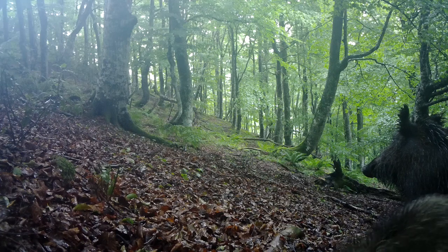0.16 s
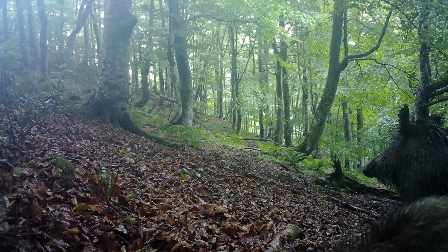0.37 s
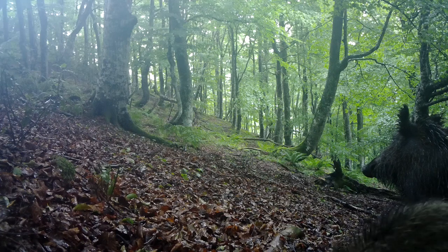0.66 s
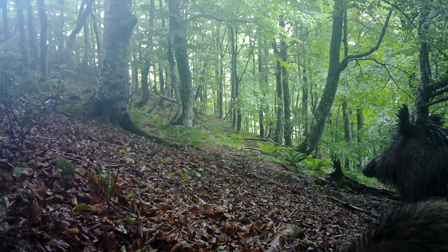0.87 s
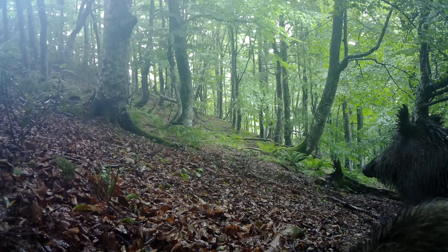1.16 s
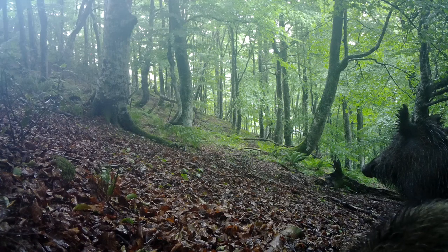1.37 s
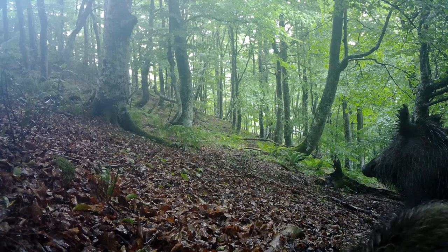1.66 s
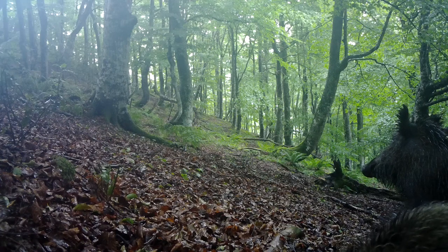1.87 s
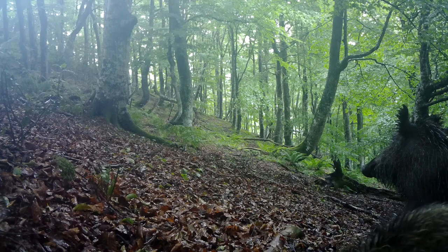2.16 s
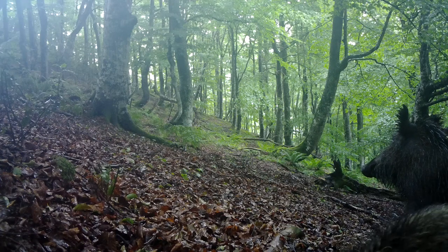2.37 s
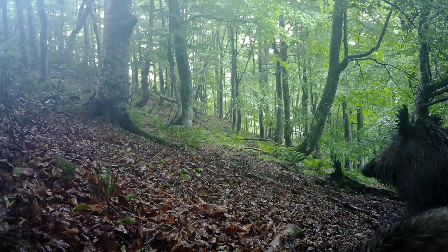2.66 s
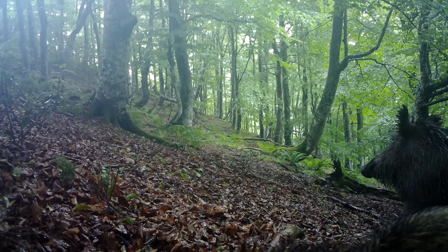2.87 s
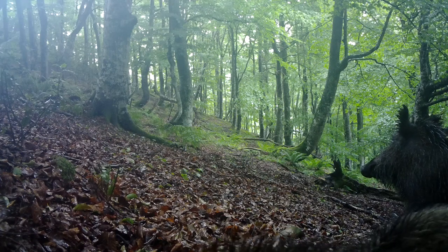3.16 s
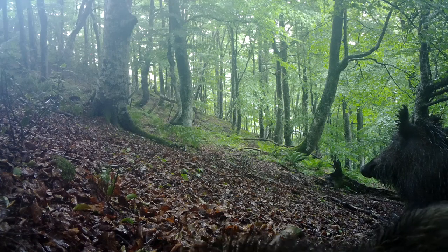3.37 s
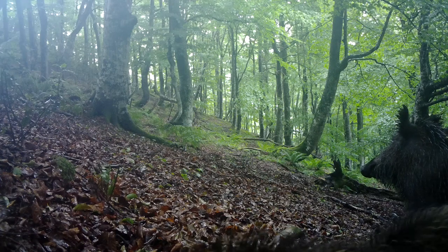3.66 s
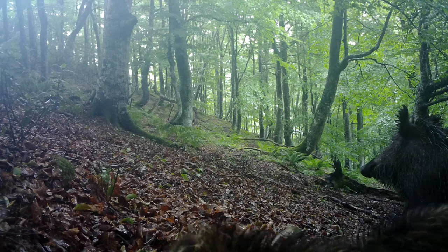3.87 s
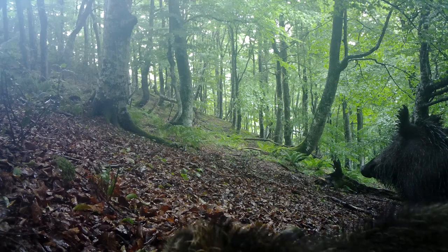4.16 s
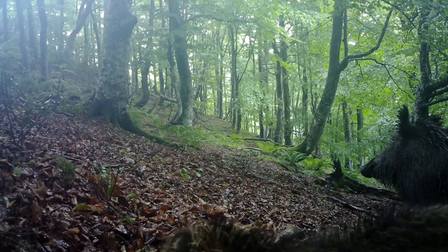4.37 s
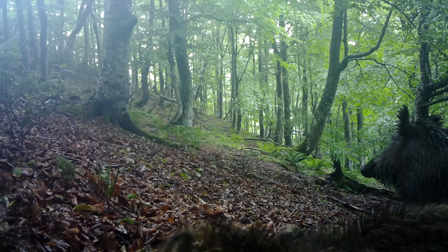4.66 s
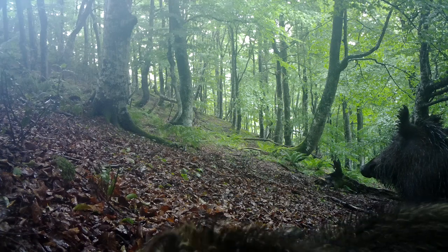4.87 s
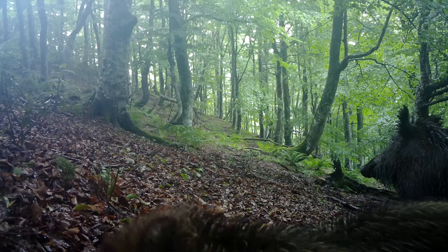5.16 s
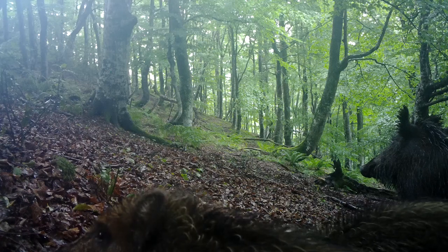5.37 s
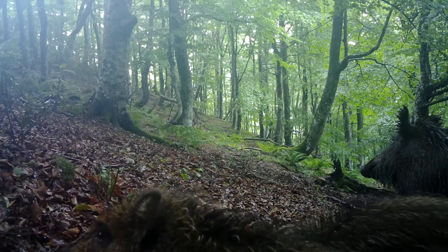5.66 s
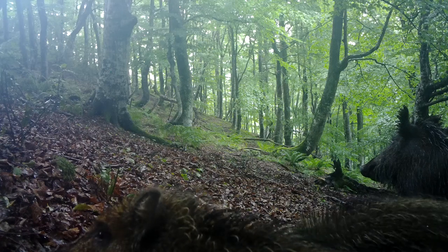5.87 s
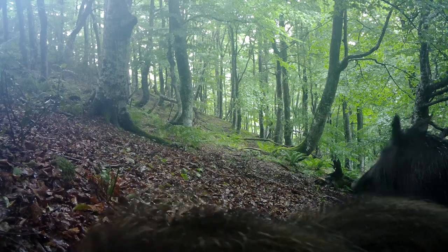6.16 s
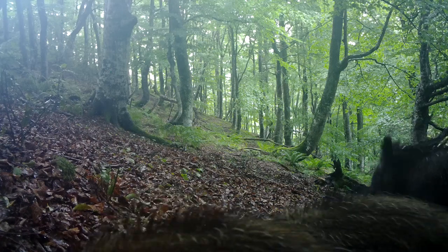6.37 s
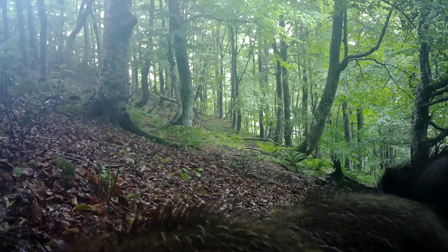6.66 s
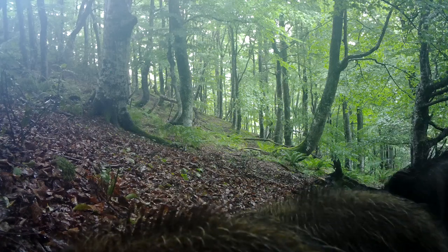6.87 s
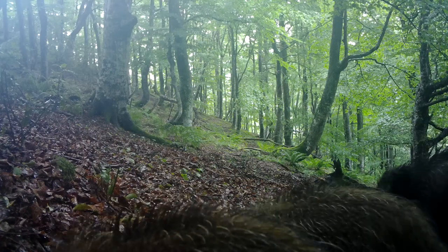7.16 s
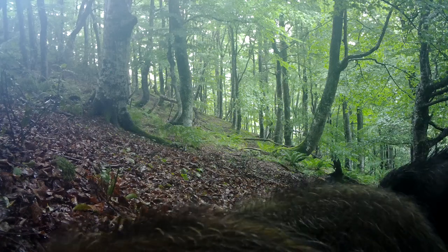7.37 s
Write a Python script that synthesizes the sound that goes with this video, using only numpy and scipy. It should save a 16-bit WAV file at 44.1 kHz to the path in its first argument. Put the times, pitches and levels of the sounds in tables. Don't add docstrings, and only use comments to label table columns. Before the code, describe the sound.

Steady rain hisses through a wood while close drops tick and splash on leaves, dry litter rustles, and an animal snorts near the end.

```python
import sys
import numpy as np
from scipy import signal
from scipy.io import wavfile

SR = 44100
rng = np.random.default_rng(int(sys.argv[2]) if len(sys.argv) > 2 else 0)


def boost_factor(decibels):
    exponent = np.asarray(decibels, float) / 20
    return 10 ** exponent


def generate_wav(sig):
    pcm = np.round(np.clip(np.atleast_2d(sig).T, -1, 1) * 32767).astype(np.int16)
    wavfile.write(sys.argv[1], SR, pcm)


N = 331632


def rms_one(x):
    return x / np.sqrt(np.mean(x ** 2) + 1e-20)


def at_hz(points, hz):
    point_hz, point_db = np.transpose(points)
    return np.interp(np.log(hz), np.log(point_hz), point_db)


def drift(rate_hz):
    r = np.exp(-80 * np.pi * rate_hz / SR)
    sparse = rng.standard_normal(N // 40 + 2002)
    slow = signal.lfilter([1], [1, -2 * r, r * r], sparse)[2000:]
    return np.interp(np.arange(N) / 40, np.arange(len(slow)), rms_one(slow))


def bands(low_hz, octaves):
    edges_hz = low_hz * 2 ** np.arange(0, octaves, 1 / 3)
    for low, high in zip(edges_hz, edges_hz[1:]):
        yield np.sqrt(low * high), signal.butter(2, [low, high], "band", fs=SR, output="sos")


def band_pass(x, low_hz, high_hz):
    band = signal.butter(2, [low_hz, min(high_hz, .45 * SR)], "band", fs=SR, output="sos")
    return signal.sosfilt(band, x)


def ring(hz, t60_s, size):
    t = np.arange(size) / SR
    return np.sin(2 * np.pi * hz * t) * boost_factor(-60 * t / t60_s)


def splashes(count, decay_s, contact):
    tail_s = 0.012
    t = np.arange(1200) / SR
    envelope = np.exp(-t / decay_s) + 0.14 * np.exp(-t / tail_s)
    spray = rng.standard_normal((count, len(t))) * envelope
    spray[:, 0] += contact
    return spray


def place(times_s, sounds):
    out = np.zeros(N + sounds.shape[1])
    for s, sound in zip(times_s, sounds):
        start = round(s * SR)
        out[start:start + len(sound)] += sound
    return out[:N]


def swells(rows):
    drop_db = 20
    s, peak_db, rise_s, fall_s = np.transpose(rows)[:4, :, None]
    since_s = np.arange(0, N, 16) / SR - s
    rising = -since_s / np.maximum(rise_s, .002)
    falling = since_s / np.maximum(fall_s, .002)
    slope = np.where(since_s < 0, rising, falling)
    return boost_factor(np.maximum(peak_db - drop_db * slope, -140))


def every_sample(coarse):
    return np.interp(np.arange(N) / 16, np.arange(len(coarse)), coarse)


def all_drops():
    # (time [s], peak level [dB], leaf mode [Hz], body under 3 kHz [dB], top above 6.5 kHz [dB])
    close_drops = [(0.489, -10, 4050, -5, -5), (0.5073, -9, 5400, 8, 3), (0.916, -17, 6500, -14, -3),
                   (0.956, -19, 2680, 5, -2), (1.058, -9.5, 2200, -5, -2.5), (1.0914, -23, 8000, -21, -3),
                   (1.234, -12.5, 7200, -14, 2), (1.5034, -20, 7900, -10, -2), (1.7926, -19, 5870, -12, -8),
                   (1.855, -22, 6000, -3, -1), (2.418, -17, 7540, 9, 12), (2.4445, -21, 8900, -3, 4),
                   (2.6219, -14.5, 3100, 2, -1), (2.8846, -16, 8500, 6, 17), (3.1347, -15.5, 5030, -0.5, 2),
                   (3.2061, -18.5, 10300, 4, 8), (3.3282, -19, 7830, 3, 1), (3.3555, -17, 4440, -22, 6),
                   (3.4416, -17.5, 4830, -3, 3), (3.9235, -14.5, 2920, -7, -5),
                   (4.018, -15.5, 8250, -10, 4), (5.246, -15, 5570, -6, 3), (5.7706, -16, 7740, -6, -3),
                   (5.8444, -17.5, 5920, -34, -4)]
    # (time [s], peak level [dB], leaf mode [Hz])
    small_drops = [(0.2414, -21, 6050), (0.3962, -22, 5900), (0.4135, -19, 3920), (0.781, -19.5, 5000),
                   (1.1353, -22, 4100), (1.6381, -20, 2600), (1.8264, -19, 1930), (1.9289, -22, 5600),
                   (1.9754, -21.5, 3960), (2.0286, -22.5, 5700), (2.3268, -23, 5870), (2.415, -29, 2140),
                   (2.7028, -24, 4100), (2.7524, -23, 4040), (2.9387, -19.5, 6070), (3.1675, -20.5, 4000),
                   (3.86, -21.5, 2800), (3.9648, -22, 4850), (4.457, -26, 4290), (4.5535, -21, 6900),
                   (4.6245, -23, 6330), (4.989, -27, 4830), (6.365, -28, 4030), (1.532, -32, 4000),
                   (6.493, -22, 4100), (6.9795, -22.5, 2440), (7.037, -21, 4850), (7.151, -18.5, 5900),
                   (7.188, -20.5, 5130), (7.451, -20.5, 6400)]
    small = []
    for s, peak_db, hz in small_drops:
        octaves = np.log2(hz / 5000)
        body_db = -3 - 4.0 * octaves
        top_db = -3 + 2 * octaves
        small.append((s, peak_db, hz, body_db, top_db))
    return np.transpose(close_drops + small)[:, :, None]


def rain():
    # (time [s], level [dB])
    rain_level = [(0.0, -37), (0.27, -39), (0.67, -38.5), (0.88, -40), (1.3, -38.5), (1.86, -39.5),
                  (2.28, -39.5), (2.6, -38.5), (2.9, -40.5), (3.44, -39.5), (4.19, -40.5), (4.77, -40.5),
                  (5.59, -40), (5.97, -40.5), (6.22, -39), (6.5, -39.5), (7.01, -39), (7.52, -39)]
    # (frequency [Hz], density [dB per Hz])
    rain_colour = [(88, -30), (150, -2), (226, -9.5), (313, 1), (385, -3.5), (515, 1), (666, -5),
                   (1020, -2.5), (1650, -4), (1990, -0.5), (4610, 1), (9000, -2.5), (11200, -8),
                   (12800, -11), (16000, -16)]
    patter_per_s, patter_db, patter_spread_db = 150, -11.5, 5
    patter_decay_s, patter_hz, patter_octaves = 0.0014, 8900, 1.2

    litter_db = np.interp(np.arange(N) / SR, *np.transpose(rain_level))
    swing_db = litter_db - litter_db.mean()
    spray_db = -44.6 + 1.56 * swing_db
    drone_db = -47 + 0.98 * swing_db

    chance, size, pitch = rng.random(N), rng.exponential(1, N), rng.standard_normal(N)
    at = np.flatnonzero(chance < patter_per_s * boost_factor(3.0 * drift(6)) / SR)
    strength = boost_factor(patter_db + patter_spread_db * np.minimum(size[at], 3.5))
    octave = np.log2(patter_hz) + .9 * pitch[at]

    white, together = rng.standard_normal((2, N)), drift(41)
    fade = np.exp(-1 / (patter_decay_s * SR))
    layers = np.zeros((3, N))
    for k, (hz, band) in enumerate(bands(140, 7.1)):
        hits = np.full(N, 1e-18)
        hits[at] = strength * np.exp(-((np.log2(hz) - octave) / patter_octaves) ** 2)
        opening = 1 + signal.lfilter([1], [1, -fade], hits)
        noise = signal.sosfilt(band, white[k % 2] * opening)
        noise = rms_one(noise) * np.sqrt(hz)
        flicker_db = (0.067 * together + 0.92 * drift(8.7)) * min(hz / 3000, 1)
        layer = np.searchsorted([1600, 6800], hz)
        layers[layer] += noise * boost_factor(at_hz(rain_colour, hz) + flicker_db)
    drone, litter, spray = map(rms_one, layers)
    return boost_factor(litter_db - 0.08) * litter + boost_factor(spray_db) * spray + boost_factor(drone_db) * drone


def rustle():
    # (time [s], peak level [dB], rise [s], fall [s], brightness [dB])
    stir_rows = [(0.0, -35, .02, 0.018, -10), (0.246, -39, 0.082, .01, -12), (1.38, -32.5, 0.03, 0.056, -7),
                 (1.875, -31.5, 0.073, 0.14, -10), (2.408, -38, .03, .06, -11), (2.48, -35, 0.068, .07, -5),
                 (2.62, -37.5, 0.0091, .2, -9), (4.022, -34, 0.027, 0.054, -7),
                 (4.992, -35.5, 0.039, 0.056, -4), (5.245, -35, .01, 0.017, -3),
                 (5.27, -38.5, .01, 0.4, -7), (6.21, -42, 0.098, .14, 4.5), (6.28, -41, .08, .06, -5),
                 (6.8, -37.5, .02, 0.14, -12), (6.894, -30.5, 0.038, 0.092, -8),
                 (7.158, -38, .2, 0.016, -23), (7.188, -42, .02, 0.078, -15)]
    # (low edge [Hz], high edge [Hz])
    litter_bands = [(300, 2300), (3000, 8000), (7000, 12500)]
    cracks_per_s, crack_decay_s = 1800, 0.0011

    stirs = swells(stir_rows)
    level = every_sample(stirs.max(axis=0))
    bright = every_sample((stirs * boost_factor(np.array(stir_rows)[:, -1:])).max(axis=0))
    crack_gain = boost_factor(1.4 * np.minimum(rng.exponential(1, N), 3))
    cracks = (rng.random(N) < cracks_per_s / SR) * crack_gain
    fade = np.exp(-1 / (crack_decay_s * SR))
    gate = .5 + signal.lfilter([1], [1, -fade], cracks + 1e-18)
    noise = gate * rng.standard_normal(N)
    crunch, crackle, fizz = (rms_one(band_pass(noise, *band)) for band in litter_bands)
    return level * (boost_factor(-7.0) * crunch + crackle) + bright * fizz


def air():
    # (frequency [Hz], density [dB per Hz])
    air_colour = [(7.1, -30), (12, 1.5), (49, -0.5), (112, -4.5), (190, -15.5), (250, -24), (420, -120)]
    # (time [s], peak level [dB], rise [s], fall [s])
    puffs = [
        (0.0, -32.5, .05, 0.081),
        (0.79, -49, .15, .2),
        (2.14, -41, 0.054, 0.095),
        (4.3, -47, 0.39, .3),
        (5.19, -43, .07, 0.08),
        (6.86, -39, 0.084, .15),
        (6.97, -34, 0.26, 0.093),
        (7.12, -37, 0.2, 0.046),
        (7.2, -55, .06, .08),
    ]
    white = rng.standard_normal((2, N))
    rumble = np.zeros(N)
    for k, (hz, band) in enumerate(bands(12, 4.5)):
        rumble += signal.sosfilt(band, white[k % 2]) * boost_factor(at_hz(air_colour, hz))
    breeze = boost_factor(-48 + 1.05 * drift(9.6))
    puff = every_sample(swells(puffs).max(axis=0))
    return np.hypot(breeze, puff) * rms_one(rumble)


def ticks():
    # (time [s], peak level [dB])
    strong_ticks = [(0.2019, -27), (0.3177, -25), (0.5072, -24), (1.1982, -19), (1.2196, -25), (1.2346, -24),
                    (1.8397, -30), (2.2702, -29), (2.4049, -31), (2.5656, -24), (2.6219, -27), (2.7107, -28),
                    (3.1592, -25), (3.2061, -21), (3.3563, -23), (3.4416, -23), (3.4865, -26), (3.5219, -23),
                    (3.9235, -24), (4.4573, -24), (4.6897, -19), (4.7162, -24), (5.1422, -27), (5.2435, -26),
                    (5.5942, -27), (5.8436, -20), (6.1968, -34), (6.8453, -27), (6.5899, -24), (7.453, -20)]
    drop_s, drop_db = all_drops()[:2]
    strong_s, strong_db = np.transpose(strong_ticks)[:, :, None]
    thrown_db = -30 + .4 * (drop_db - drop_db.mean())
    s = np.vstack([strong_s, drop_s])
    peak_db = np.vstack([strong_db, thrown_db])
    spray = splashes(count=len(s), decay_s=0.00036, contact=4.0)
    return place(s[:, 0] + .001, boost_factor(peak_db) * band_pass(spray, 10800, 14700))


def drops():
    # (low edge [Hz], high edge [Hz])
    leaf_bands = [(1100, 3000), (3000, 6500), (6500, 11000)]
    s, peak_db, hz, low_db, high_db = all_drops()
    spray = splashes(count=len(s), decay_s=0.0011, contact=4.5)
    hollow = hz < 3000
    body, middle, top = (band_pass(spray, *band) for band in leaf_bands)
    splash = boost_factor(low_db + 2.5 - 12.0 * hollow) * body
    splash -= boost_factor(-2.5) * middle
    splash += boost_factor(high_db - 0.7) * top
    mode_db = np.where(hollow, low_db, np.where(hz < 6500, 2.5, high_db))
    t60_s = .013 * (4000 / hz) ** .4
    mode = boost_factor(mode_db - 5.0 + 1.5 * hollow) * ring(hz, t60_s, size=1200)
    shape = splash + mode
    peak = np.abs(shape).max(axis=1, keepdims=True)
    return place(s[:, 0] + .001, boost_factor(peak_db + 1.25) * shape / peak)


def thumps():
    # (time [s], peak level [dB], mode [Hz])
    ground_hits = [(0.488, -28, 493), (1.055, -29, 157), (1.132, -46, 291), (1.79, -42, 326),
                   (1.977, -32, 270), (2.618, -39, 614), (2.697, -35, 480), (3.203, -39, 145),
                   (3.247, -33, 298), (3.632, -38, 394), (3.918, -41, 455), (4.016, -32, 162),
                   (4.069, -35, 447), (4.135, -32, 132), (4.796, -32.5, 276), (5.677, -39, 517),
                   (6.356, -37, 323), (6.739, -34, 750), (6.837, -36, 490), (7.316, -33.5, 148)]
    s, peak_db, hz = np.transpose(ground_hits)[:, :, None]
    rise_s = 0.00095
    rounded = 1 - np.exp(-np.arange(3000) / (rise_s * SR))
    return place(s[:, 0], boost_factor(peak_db + 6.5) * rounded * ring(hz, 0.018, size=3000))


def plinks():
    # (time [s], peak level [dB], mode [Hz])
    leaf_rings = [(0.489, -21, 2760), (0.507, -21, 2100), (0.507, -27, 7500), (1.058, -22, 4500),
                  (1.057, -25.5, 2100), (1.233, -25, 4620), (1.058, -32, 7900), (3.9235, -28, 4030),
                  (3.9235, -31, 6300), (1.7916, -33, 840), (1.7916, -27, 3420), (2.622, -42, 1500),
                  (0.915, -27, 2050), (0.9573, -26.5, 2020), (1.1348, -32, 2170), (1.5872, -22, 1620),
                  (1.7916, -32, 1530), (2.9385, -43, 1920), (3.6531, -32, 1850), (3.966, -34, 1550),
                  (4.5042, -29, 2140), (5.7703, -27, 2170)]
    s, peak_db, hz = np.transpose(leaf_rings)[:, :, None]
    return place(s[:, 0] + 0.00099, boost_factor(peak_db + 1.0) * ring(hz, 0.017, size=1200))


def faint_drops():
    # (time [s], peak level [dB], pitch [Hz])
    faint_hits = [(0.968, -27, 8500), (1.665, -25, 6000), (2.2692, -28, 9000), (2.3992, -29, 2480),
                  (2.457, -24, 7500), (2.662, -21, 5500), (2.775, -29, 9500), (3.3088, -22, 6500),
                  (3.4054, -24, 8240), (3.478, -24, 4780), (3.6531, -29, 2700), (3.8406, -31, 2680),
                  (4.337, -28, 4000), (4.432, -29, 5340), (4.504, -31.5, 2150), (4.7155, -30, 5000),
                  (5.0404, -32, 3300), (5.366, -30, 3950), (6.014, -25, 4670), (6.1843, -20, 8180),
                  (6.471, -29, 7000), (6.5903, -30, 5000), (6.6944, -26.5, 4440), (6.93, -26, 6500),
                  (7.0184, -24, 6900), (6.1963, -16.5, 9200), (6.2164, -18, 7600), (7.47, -30, 1510),
                  (7.5033, -25, 5920)]
    patch_octaves = .5
    s, peak_db, hz = np.transpose(faint_hits)
    spray = splashes(count=len(s), decay_s=0.0007, contact=1.3)
    spread = 2 ** (patch_octaves / 2)
    shape = np.array([band_pass(one, mid / spread, mid * spread) for one, mid in zip(spray, hz)])
    peak = np.abs(shape).max(axis=1, keepdims=True)
    return place(s + 0.000997, boost_factor(peak_db[:, None] + 1.0) * shape / peak)


def trunks(x):
    dull = signal.lfilter([.4], [1, -.6], x)
    out = x.copy()
    for lag_s, echo_db in [(.0021, -29), (.0083, -23.5), (.017, -25)]:
        lag = round(lag_s * SR)
        out[lag:] += boost_factor(echo_db) * dull[:-lag]
    return out


def scene():
    bed = rain()
    close = rustle() + ticks() + drops() + thumps() + plinks() + faint_drops()
    return (bed + trunks(close) + air())[None]


def low_pass(x):
    return signal.sosfilt(signal.butter(12, 16650, fs=SR, output="sos"), x)


def record(dry):
    top_cut = signal.ellip(12, .5, 58, 15720, fs=SR, output="sos")
    mix = signal.sosfilt(top_cut, dry)
    return low_pass(mix)


dry = scene()
out = record(dry)
generate_wav(out)
```